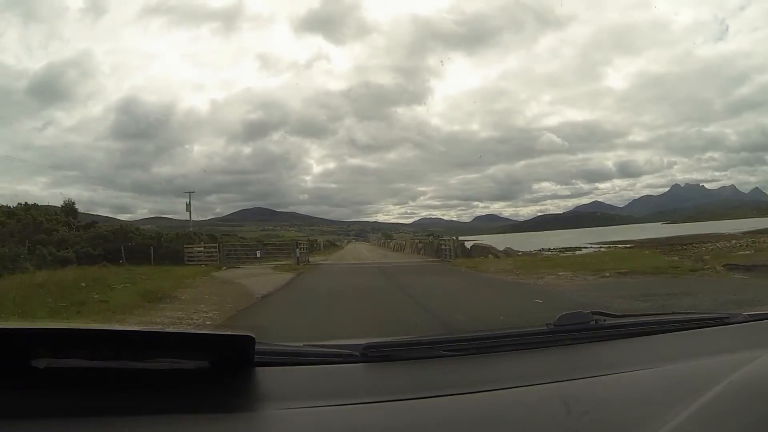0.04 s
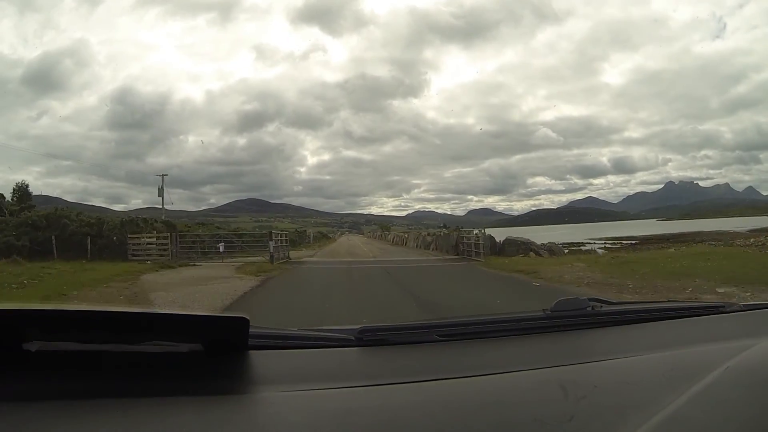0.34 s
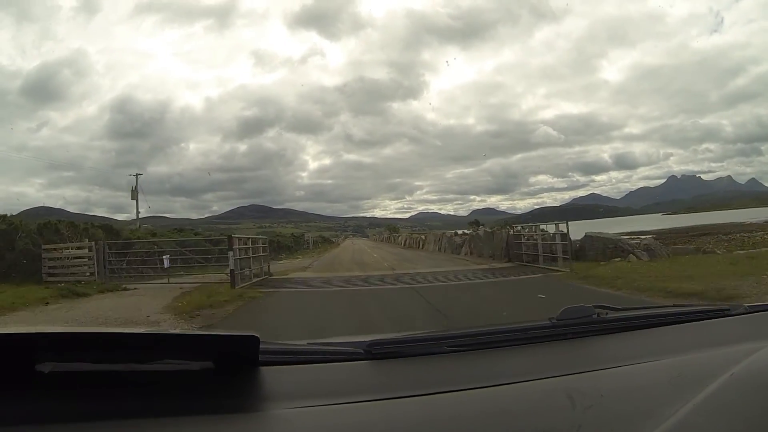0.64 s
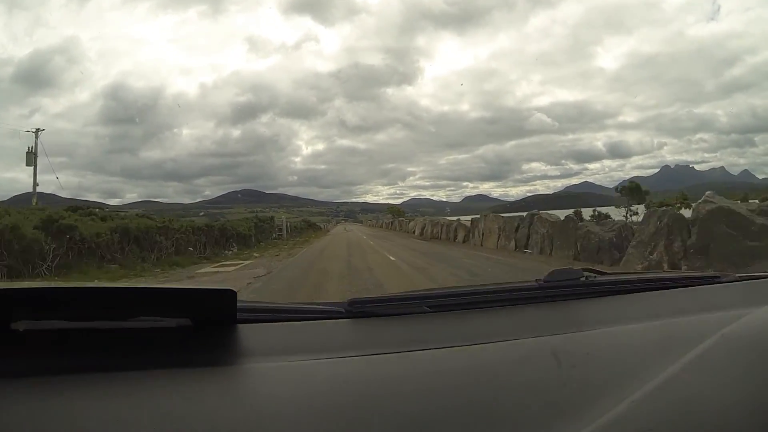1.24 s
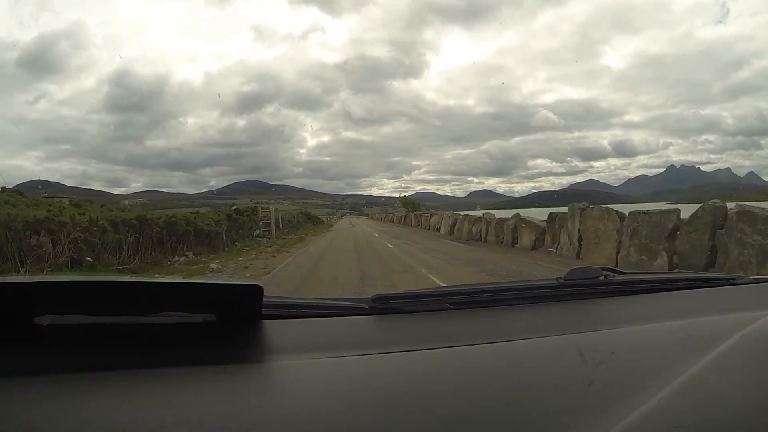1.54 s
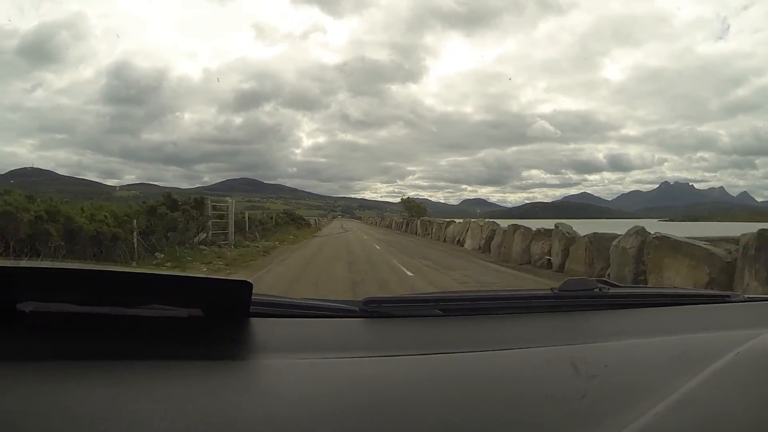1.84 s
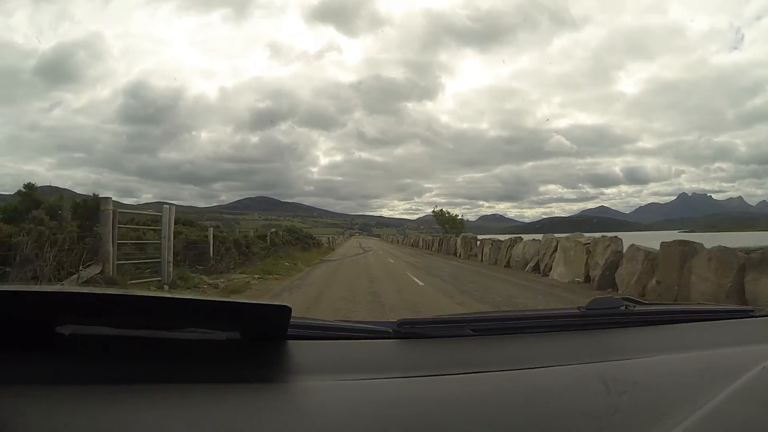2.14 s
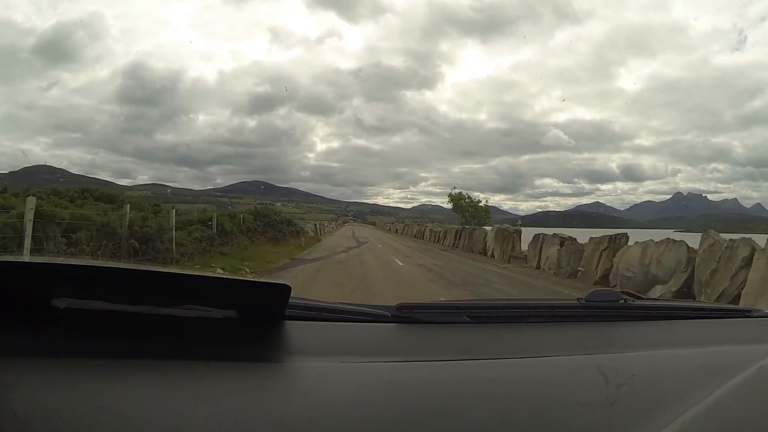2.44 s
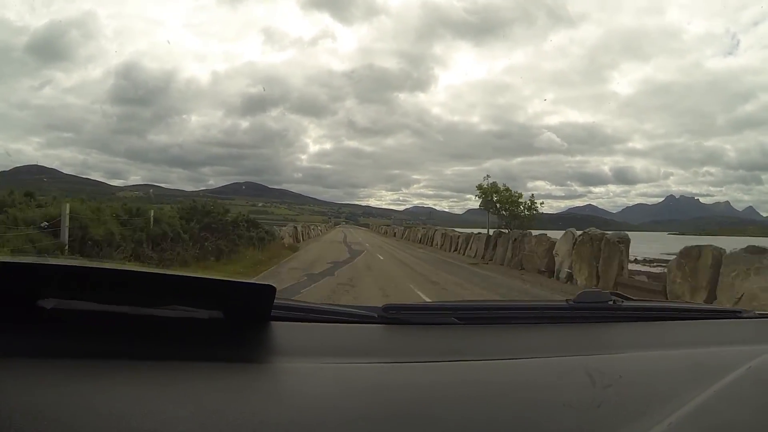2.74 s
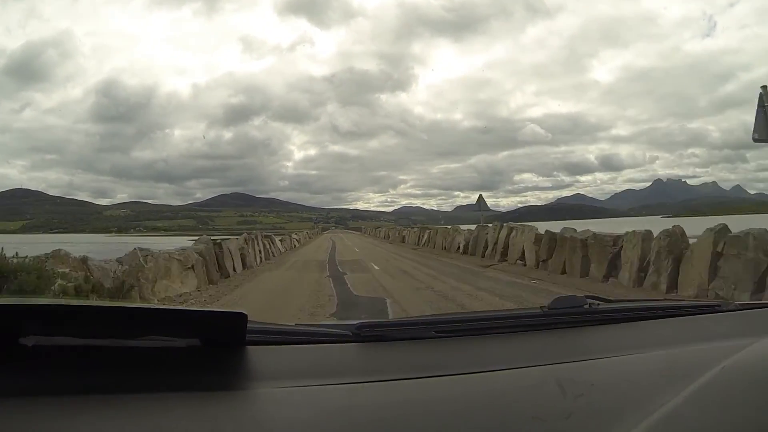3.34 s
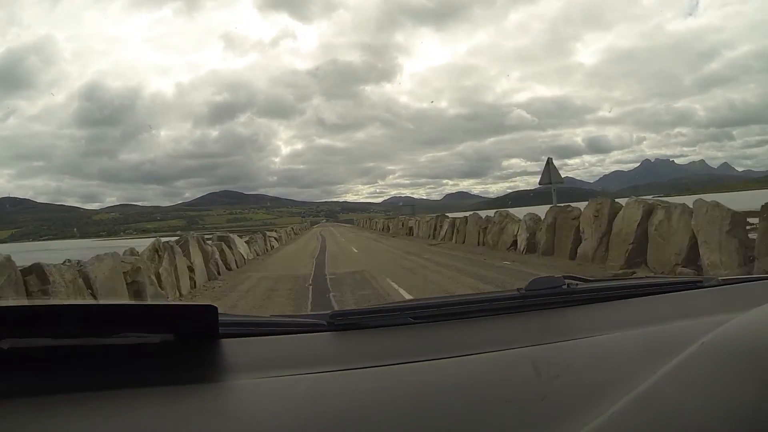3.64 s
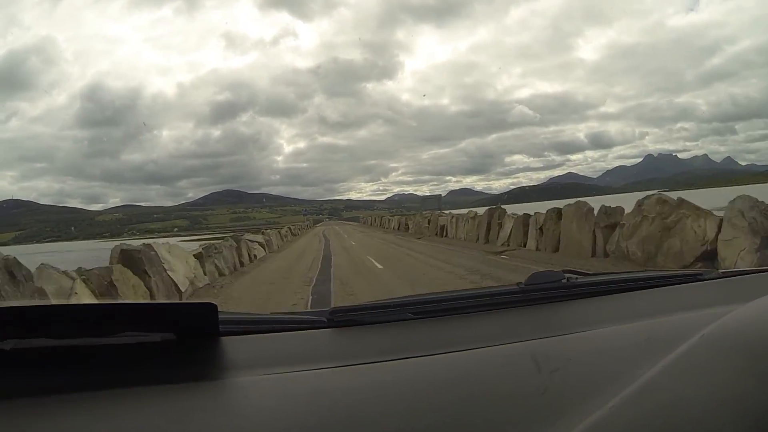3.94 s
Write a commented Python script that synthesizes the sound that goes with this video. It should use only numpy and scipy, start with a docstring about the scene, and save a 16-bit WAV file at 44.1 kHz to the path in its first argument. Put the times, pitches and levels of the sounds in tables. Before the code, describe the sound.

Low road rumble and engine drone fill a moving car's cabin. A quick buzzing rattle comes as both axles cross a cattle grid, followed by rougher tyre noise, soft bumps and faint plastic ticks near the dashboard microphone.

```python
"""A low rumble and a pulling engine inside a car on a country road, heard from the dashboard.
The engine lets off and coasts as the wheels drum over a cattle grid, front axle first; the bars knock
through the suspension and set the trim buzzing. After a short smooth patch the road turns coarse:
the body rumbles, the cabin booms and the tyres roar. Throughout, jolts make a loose plastic part tick."""
import sys
import numpy as np
from scipy import signal
from scipy.fft import irfft
from scipy.io import wavfile
from scipy.ndimage import uniform_filter1d, minimum_filter1d

SR = 44100
rng = np.random.default_rng(int(sys.argv[2]) if len(sys.argv) > 2 else 0)


def file_out(sig):
    """Save sig as 16-bit WAV at sys.argv[1]."""
    # one column per channel
    cols = np.atleast_2d(sig).T
    # limit, then scale
    lim = np.clip(cols, -1, 1)
    pcm = np.round(lim * 32767).astype(np.int16)
    wavfile.write(sys.argv[1], SR, pcm)


N = 176400

# spectrum of trim scrapes and cracks: freq_hz, relative_db
SCRAPE_SPECTRUM = [(1200, -2), (2500, 1), (4000, -0.5), (6000, -8.5), (8500, -18), (12500, -19),
                   (14500, -30.5)]


def undb(db):
    """Decibels to gain."""
    return 10 ** (np.asarray(db) / 20)


def unit(x):
    """Scale to rms 1."""
    return x / np.sqrt(np.mean(x ** 2) + 1e-20)


def clock():
    """Sample times in seconds."""
    return np.arange(N) / SR


def curve(rows):
    """Straight lines through (time_s, value) rows."""
    return np.interp(clock(), *np.array(rows, float).T)


def ramp(start_s, length_s):
    """Linear rise from 0 to 1."""
    return np.clip((clock() - start_s) / max(length_s, 1e-4), 0, 1)


def envelope(on_s, off_s, attack_s, release_s):
    """Linear attack, hold, exponential release."""
    return ramp(on_s, attack_s) * np.exp(-np.maximum(clock() - off_s, 0) / release_s)


def swell(centre_s, half_width_s):
    """Gaussian rise and fall."""
    return np.exp(-((clock() - centre_s) / half_width_s) ** 2)


def drift(rate_hz):
    """Smooth random drift, rms 1."""
    hold = max(int(SR / rate_hz), 2)
    steps = np.repeat(rng.standard_normal(N // hold + 1), hold)
    return unit(uniform_filter1d(uniform_filter1d(steps, hold), hold)[:N])


def noise(spectrum):
    """Noise of rms 1 shaped by (freq_hz, relative_db) rows; falls 20 dB per octave past the ends."""
    hz, db = np.array(spectrum, float).T
    octave = np.log2(np.maximum(np.arange(N // 2 + 1) * SR / N, 1))
    beyond = np.abs(octave - np.clip(octave, np.log2(hz[0]), np.log2(hz[-1])))
    gain = undb(np.interp(octave, np.log2(hz), db) - 20 * beyond)
    return unit(irfft(gain * np.exp(2j * np.pi * rng.random(len(octave))), N))


def steady(x, window_s):
    """Divide by the running rms to even out swells."""
    return x / np.sqrt(uniform_filter1d(x ** 2, max(int(window_s * SR), 2)))


def tone(hz):
    """Sine of rms 1 following a frequency track, random start phase."""
    return np.sqrt(2) * np.sin(2 * np.pi * (np.cumsum(hz) / SR + rng.random()))


def road():
    """The surface shakes the body, booms in the cabin and makes the tyres roar and hiss."""
    # level of each layer: time_s, level_db
    rumble_levels = [(0.0, -19), (0.18, -9.5), (0.24, -21), (0.63, -11.5), (0.98, -15.5), (1.11, -9.5),
                     (1.39, -25), (1.49, -16), (2.34, -12.5), (3.73, -12), (3.95, -9), (4.0, -27)]
    boom_levels = [(0, -26.5), (.6, -27), (1.1, -26), (1.45, -25), (1.7, -20), (2.3, -21), (2.7, -25),
                   (3.1, -23.5), (3.5, -24.5), (4, -27.5)]
    roar_levels = [(0, -49), (.5, -42), (.85, -43.5), (1.1, -40.5), (1.3, -42.5), (1.48, -46), (1.7, -38),
                   (2.28, -34), (2.6, -38), (3.1, -38), (3.45, -40.5), (3.9, -37.5), (4, -47)]
    hiss_levels = [(0, -66), (.3, -61), (.7, -59), (1.1, -57.5), (1.33, -55), (1.45, -65.5), (1.58, -59.5),
                   (1.7, -53), (1.81, -54.5), (2.25, -55), (2.65, -59), (3.05, -55.5), (3.5, -59),
                   (3.9, -56.5), (4, -65)]
    # spectrum of each layer: freq_hz, relative_db
    rumble_spectrum = [(6, -32), (14, -7), (21, 0), (29, -8.5), (39, -3), (48, -10.5), (57, -7.5),
                       (67, -16.5), (95, -20.5), (130, -44.5)]
    boom_spectrum = [(70, -28.5), (100, -10.5), (123, 1.5), (140, 0), (156, -1), (172, -12), (210, -17.5),
                     (236, -11), (258, -18.5), (290, -18.5), (350, -27), (500, -48.5)]
    roar_spectrum = [(180, -5), (300, 1.5), (370, 4), (440, 6.5), (530, -0.5), (800, -1), (1080, -0.5),
                     (1280, -6.5), (1550, -6), (1850, -12.5), (2200, -14.5), (2700, -27.5), (5000, -49)]
    hiss_spectrum = [(1500, -10), (2600, 2), (3500, 1.5), (4600, -4), (6000, -6.5), (6900, -13),
                     (7800, -12.5), (8600, -17.5), (10200, -18), (12500, -23), (14000, -28)]
    rumble = steady(noise(rumble_spectrum), window_s=0.26) * undb(curve(rumble_levels))
    boom = steady(noise(boom_spectrum), window_s=0.2) * undb(curve(boom_levels))
    texture = drift(60)
    roar = noise(roar_spectrum) * undb(curve(roar_levels) + 0.79 * texture)
    hiss = noise(hiss_spectrum) * undb(curve(hiss_levels) + 0.7 * texture + 1.1 * drift(350))
    return rumble + boom + roar + hiss


def bumps():
    """Uneven patches thud through the suspension."""
    # road bumps: centre_s, half_width_s, level_db
    patches = [(0.593, 0.074, -33.5), (1.654, 0.075, -33.5), (2.1, .09, -30.5), (2.51, 0.07, -35),
               (2.83, 0.031, -29.5), (2.965, .03, -37.5), (3.125, 0.04, -29), (3.881, .04, -32.5)]
    # thud spectrum: freq_hz, relative_db
    spectrum = [(110, -8), (160, 0), (200, -7.5), (238, 0.5), (280, 0), (330, -4), (430, -4), (520, -16.5),
                (900, -20)]
    level = sum(undb(db) * swell(centre_s, half_width_s) for centre_s, half_width_s, db in patches)
    return steady(noise(spectrum), window_s=0.03) * level


def tyre_rings():
    """The air in the tyres rings briefly."""
    # air resonances: centre_s, half_width_s, pitch_hz, level_db
    rings = [(2.044, 0.094, 441, -39.5), (2.563, 0.11, 438, -41), (3.748, 0.062, 233.8, -29)]
    wander_hz = 4.99
    return sum(tone(hz + wander_hz * drift(60)) * undb(db) * swell(centre_s, half_width_s)
               for centre_s, half_width_s, hz, db in rings)


def tyre_swish():
    """The tyres swish as the coarse surface begins."""
    # swish spectrum: freq_hz, relative_db
    spectrum = [(2000, -8), (3300, 2), (4300, -2), (6100, 0), (7000, -12), (8500, -17), (12500, -21)]
    return noise(spectrum) * undb(-53.5) * swell(centre_s=1.705, half_width_s=0.057)


def trim_ticks():
    """Jolts make a loose plastic part tick; only hard ticks make it ring."""
    # ticks: time_s, strength_db
    ticks = [(0.1248, -41.5), (0.154, -45.5), (0.1775, -43), (.6536, -50), (.6833, -43.5), (.7045, -51),
             (0.8205, -55), (1.132, -40), (1.266, -39), (1.328, -47.5), (2.3086, -50), (2.3964, -45),
             (2.5224, -52), (2.6826, -41), (2.7318, -53), (2.919, -51), (2.9387, -50), (2.9707, -45),
             (3.1343, -44), (3.1526, -41.5), (3.2016, -42.5), (3.2442, -46.5), (3.3086, -45), (3.3521, -42),
             (3.372, -48), (3.4433, -46), (3.4937, -42), (3.643, -44.5), (3.697, -47.5), (3.749, -43.5),
             (3.81, -44.5), (3.9238, -44.5), (3.9425, -41)]
    # tick spectrum: freq_hz, relative_db
    spectrum = [(700, -9), (1700, 0), (2400, 1.5), (3000, -6), (4000, -7.5), (4800, -7.5), (6300, -13),
                (7400, -14), (8600, -21), (12500, -25), (14500, -34.5)]
    gain_db, rise_s, fall_s = 1, 0.0016, 0.0012
    ring_hz, hard_db = 2400, -40.5
    level = sum(undb(db + gain_db) * envelope(time_s - rise_s / 2, time_s + rise_s, rise_s, fall_s)
                for time_s, db in ticks)
    hardness = np.minimum(level / undb(hard_db), 1) ** 2
    click = noise(spectrum)
    ring = 0.84 * hardness * tone(ring_hz * (1 + 0.036 * drift(300)))
    return level * (click + ring)


def trim_scrapes():
    """Loose trim scrapes in short, grainy bursts."""
    # scrapes: start_s, length_s, level_db
    scrapes = [(0.046, 0.032, -54), (3.421, 0.015, -45.5)]
    level = sum(undb(db) * envelope(start_s, start_s + length_s, attack_s=0.0047, release_s=0.004)
                for start_s, length_s, db in scrapes)
    return level * noise(SCRAPE_SPECTRUM) * undb(2.5 * drift(500))


def trim_chinks():
    """Small hard parts chink: a high ring over a shorter crack."""
    # chinks: start_s, ring_hz, ring_db, decay_s
    chinks = [(1.9881, 9800, -50, .004), (3.524, 7400, -44.5, 0.016)]
    wander_hz, crack_db = 430, 2.5
    out = 0
    for start_s, hz, db, decay_s in chinks:
        ring = tone(hz + wander_hz * drift(900)) * envelope(start_s, start_s, 0.001, decay_s)
        crack = noise(SCRAPE_SPECTRUM) * envelope(start_s, start_s, 0.00084, 0.7 * decay_s)
        out += undb(db) * (ring + undb(crack_db) * crack)
    return out


def engine():
    """Firing orders: the second booms under load, the first leads when coasting; the pull adds clatter."""
    # engine speed: time_s, firing_hz
    firing = [(0, 75.37), (.5, 76.48), (1.1, 78.67), (1.7, 79.1), (2.3, 78.84), (3, 78.26), (4, 77.0)]
    # engine orders: firing_multiple, pull_db, coast_db
    orders = [(1, -24.5, -17), (2, -18, -31), (3, -28.5, -41), (4, -43.5, -51.5), (5, -42, -49.5),
              (6, -44, -53.5)]
    # exhaust rasp and mechanical clatter: freq_hz, relative_db
    clatter_spectrum = [(150, 13.5), (190, 28.5), (250, 21.5), (350, 21), (450, 21), (600, 18), (850, 10),
                        (1100, 5.5), (1600, 4.5), (2100, -2.5), (2700, -9), (3500, -5), (4300, -14.5),
                        (5300, -10), (5800, -21), (6300, -14.5), (6800, -23), (7300, -19.5), (8500, -29.5)]
    lift_s, rough_db_per_order = 1.12, 0.26
    clatter_at_lift_db, rise_db_per_s = -37, 2.5
    firing_hz = curve(firing) * (1 + 0.0015 * drift(14))
    pull = 1 - ramp(lift_s, length_s=0.12)
    coast = ramp(start_s=1.548, length_s=0.62)
    drone = 0
    for order, pull_db, coast_db in orders:
        level = pull * undb(pull_db) + coast * undb(coast_db)
        drone += tone(order * firing_hz) * level * undb(order * rough_db_per_order * drift(25))
    clatter = noise(clatter_spectrum) * (1 + 0.2 * tone(firing_hz))
    clatter_db = clatter_at_lift_db + rise_db_per_s * (clock() - lift_s)
    return drone + clatter * pull * undb(clatter_db)


def dashboard():
    """The dashboard resonates while the front axle is on the bars."""
    ring_hz, wander_hz = 246, 12
    level = undb(-16.5) * envelope(on_s=1.172, off_s=1.257, attack_s=0.014, release_s=0.0047)
    return tone(ring_hz + wander_hz * drift(90)) * level


def grid_knocks():
    """Some bars knock hard through the suspension."""
    # knocks: start_s, level_db
    knocks = [(1.126, -15), (1.152, -19.5), (1.181, -24.5), (1.218, -18), (1.249, -13.5), (1.328, -25)]
    # knock spectrum: freq_hz, relative_db
    spectrum = [(60, -3), (85, 4.5), (125, 10), (190, 2), (270, 2), (370, 1), (480, -8.5), (700, -16),
                (1200, -23), (2500, -33)]
    level = sum(undb(db) * envelope(start_s, start_s + 0.003, attack_s=0.002, release_s=0.0073)
                for start_s, db in knocks)
    return level * steady(noise(spectrum), window_s=0.028)


def cattle_grid():
    """Each axle drums across the bars; every bar kicks the trim into a buzz."""
    # axle crossings: on_s, off_s, drum_db, buzz_relative_db
    axles = [(1.118, 1.26, -17.5, -43), (1.256, 1.393, -14, -57)]
    # bar harmonics: multiple, front_relative_db, rear_relative_db
    harmonics = [(1, 3.5, 1.5), (2, -13.5, -22.5), (3, -15, -27.5), (4, -26.5, -30), (5, -37, -40),
                 (6, -31.5, -33)]
    # trim buzz spectrum: freq_hz, relative_db
    buzz_spectrum = [(200, -10.5), (280, 17.5), (340, 17), (500, 11), (700, 12), (1100, 4), (1800, -2),
                     (2800, -11.5), (4500, -10.5), (6100, -11.5), (7200, -19), (9000, -23.5), (12500, -31),
                     (14500, -41)]
    bar_hz, jitter, scatter_db, buzz_gain_db = 122.5, 0.025, 1, 11.5
    out = 0
    for axle, (on_s, off_s, drum_db, buzz_db) in enumerate(axles):
        rate_hz = bar_hz * (1 + jitter * drift(70))
        drum = sum(tone(k * rate_hz) * undb(axle_db[axle] + scatter_db * np.sqrt(k) * drift(70))
                   for k, *axle_db in harmonics)
        out += drum * undb(drum_db) * envelope(on_s, off_s, attack_s=0.018, release_s=0.026)
        bar_phase = np.cumsum(rate_hz) / SR % 1
        kicks = unit(np.exp(-bar_phase))
        buzz = noise(buzz_spectrum) * kicks * undb(buzz_db + buzz_gain_db)
        out += buzz * envelope(on_s, off_s, attack_s=0.062, release_s=0.007)
    return out


def scene():
    """Mono mix at the dashboard."""
    driving = engine() + road() + bumps() + tyre_rings() + tyre_swish()
    crossing = cattle_grid() + dashboard() + grid_knocks()
    trim = trim_ticks() + trim_scrapes() + trim_chinks()
    return (driving + crossing + trim)[None]


def record(dry):
    """Smooth peak limiter, then a steep low-pass."""
    ceiling, window_samples, cutoff_hz = 0.85, 700, 14000
    gain = ceiling / np.maximum(np.abs(dry), ceiling)
    gain = uniform_filter1d(minimum_filter1d(gain, window_samples), window_samples)
    lowpass = signal.ellip(8, 0.1, 60, cutoff_hz, fs=SR, output="sos")
    return signal.sosfiltfilt(lowpass, dry * gain)


dry = scene()
out = record(dry)
file_out(out)
```